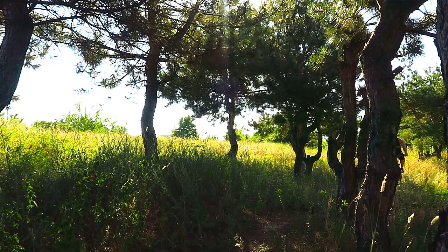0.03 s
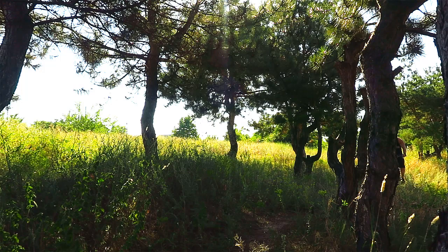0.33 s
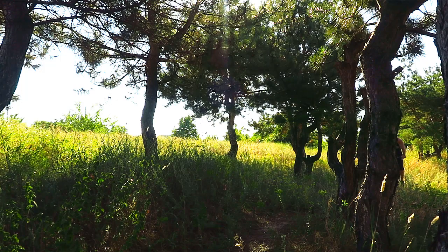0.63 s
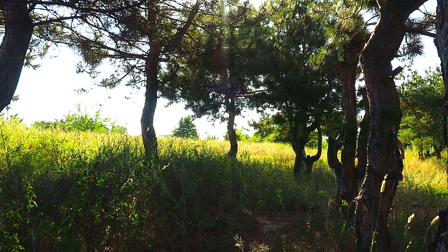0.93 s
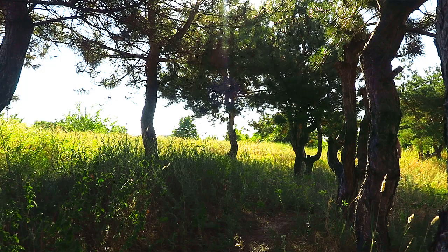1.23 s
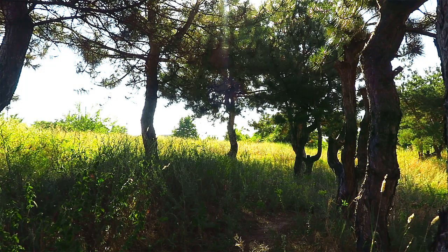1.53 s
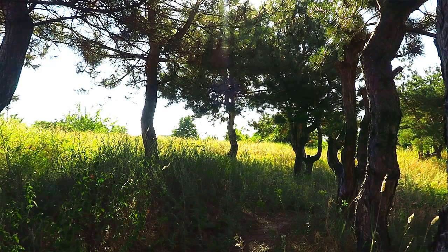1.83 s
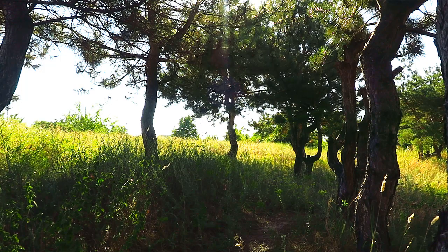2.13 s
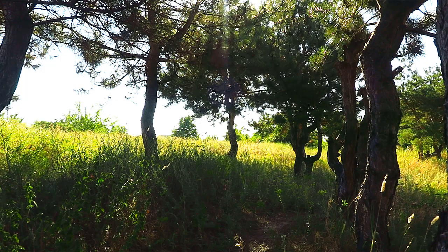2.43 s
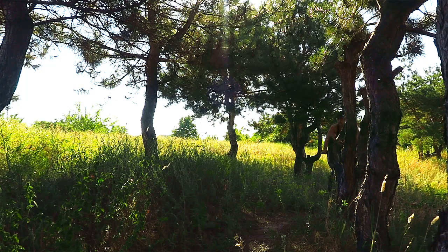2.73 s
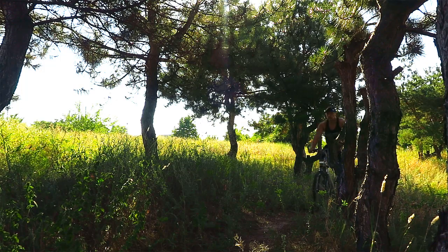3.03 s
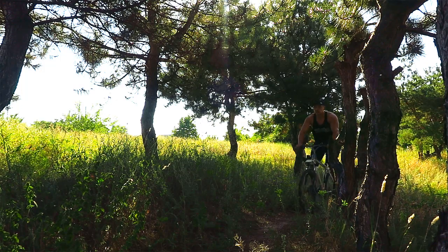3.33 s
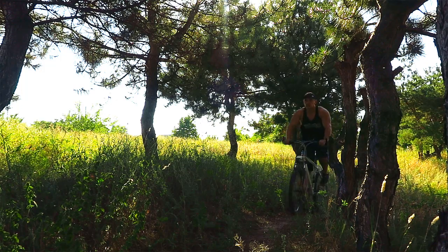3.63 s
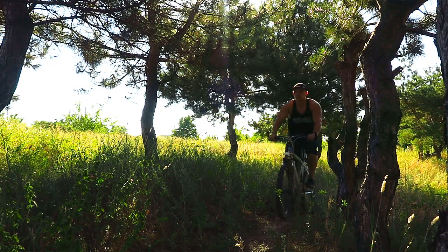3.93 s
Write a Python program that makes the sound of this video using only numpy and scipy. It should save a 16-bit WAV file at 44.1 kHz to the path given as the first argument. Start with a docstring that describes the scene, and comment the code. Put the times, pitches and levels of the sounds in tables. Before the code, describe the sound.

A bicycle rattles faintly, then clacks and crackles through dry grass, rumbling as it nears the microphone. Among the trees, a small bird gives quick sliding whistles and then hoarse rasps, with a short echo and soft distant air.

```python
"""The edge of a pine wood on a still day. Over a low hum, distant air and a few faint far-off tones,
a small bird twitters in quick sliding whistles and ends with a run of harsh, pulsing rasps.
A bicycle comes up a grassy track: bumps shake its chain and frame, loose parts clack, and its tyres
crackle through dry stalks, rumble and drone as it nears. The trees echo the bird and the rattling."""
import sys
import numpy as np
from scipy import signal
from scipy.fft import rfft, irfft, next_fast_len
from scipy.io import wavfile
from scipy.ndimage import uniform_filter1d, map_coordinates

SR = 44100
rng = np.random.default_rng(int(sys.argv[2]) if len(sys.argv) > 2 else 0)


def generate_wav(signal):
    """Clip the signal to [-1, 1] and save it as 16-bit WAV at the path in sys.argv[1]."""
    frames = np.transpose(np.atleast_2d(signal))
    scaled = np.clip(frames, -1, 1) * 32767
    pcm = np.round(scaled).astype(np.int16)
    wavfile.write(sys.argv[1], SR, pcm)


N = 176400


def amp(db):
    """Turn decibels into a number to multiply by."""
    return 10 ** (np.asarray(db) / 20)


def unit(x):
    """Scale a signal to an average strength (rms) of 1."""
    return x / np.sqrt(np.mean(x ** 2) + 1e-20)


def clock():
    """The time of each sample, in seconds."""
    return np.arange(N) / SR


def along(points, hz):
    """Read between (frequency, value) points, on a scale of octaves."""
    f, v = np.transpose(points)
    return np.interp(np.log(hz + 1), np.log(f + 1), v)


def level(rows):
    """A volume curve through (time, level) points."""
    return amp(np.interp(clock(), *np.transpose(rows)))


def wobble(rate):
    """A smooth random curve with `rate` new values a second."""
    return map_coordinates(rng.standard_normal(8192), [clock() * rate], mode='wrap')


def filtered(x, response):
    """Turn each frequency up or down by response(hz)."""
    size = next_fast_len(N + 8192)
    return irfft(rfft(x, size) * response(np.fft.rfftfreq(size, 1 / SR)), size)[..., :N]


def pan(db):
    """Left and right volumes; above 0 dB leans left."""
    return amp([[db / 2], [-db / 2]])


def gate(start, length, edge_s):
    """Switch a note on and off softly."""
    t = clock() - start
    return np.clip(np.minimum(t, length - t) / edge_s + .5, 0, 1)


def arch(start, length):
    """Rise from 0 to 1 and fall back."""
    return np.sin(np.pi * np.clip((clock() - start) / length, 0, 1))


# How wide noise sounds (frequency [Hz], side minus middle [dB])
STEREO_WIDTH = [(30, -44), (70, -50), (130, -14.5), (250, 0), (500, -4), (1100, -1.5), (2000, -0.5),
                (3000, 1), (4500, 2), (8000, 4), (12000, 4)]

def spread(pair, spectrum):
    """Give two noises a tone colour; one fills the middle, the other the sides."""
    def response(hz):
        width = amp(along(STEREO_WIDTH, hz))
        return amp(along(spectrum, hz)) * np.array([np.ones_like(hz), width]) / np.hypot(1, width)
    mid, side = filtered(pair, response)
    return unit(np.array([mid + side, mid - side]))


def crackle(spectrum, ticks_per_s=2200, tick_share=0.35, uneven_db=2.5):
    """Many tiny ticks of uneven size on a bed of hiss."""
    sizes = amp(uneven_db * np.minimum(rng.exponential(size=N), 4))
    ticks = unit((rng.random(N) < ticks_per_s / SR) * sizes * rng.standard_normal((2, N)))
    hiss = rng.standard_normal((2, N))
    return spread(np.sqrt(tick_share) * ticks + np.sqrt(1 - tick_share) * hiss, spectrum)


# Tone colour of the air (frequency [Hz], relative level [dB])
AIR_COLOUR = [(20, -8), (45, -3), (70, -1.5), (105, -0.5), (160, -7), (300, -10.5), (500, -9.5),
              (700, -15.5), (1200, -16.5), (1800, -23.5), (3200, -25), (4500, -29), (7000, -33.5),
              (12500, -40.5), (14000, -101)]
# Which side the air leans to (frequency [Hz], left minus right [dB])
AIR_LEAN = [(150, 0.5), (500, 0.5), (1100, -2), (2500, -0.5), (8000, 0)]

def air(level_db=-49, patchy_db=2):
    """A soft, slightly patchy rush from far away."""
    noise = signal.stft(rng.standard_normal((2, N)), nperseg=512)[2]
    patches = uniform_filter1d(rng.standard_normal(noise.shape[1:]), size=6, axis=0)  # blur in pitch
    patches = uniform_filter1d(patches, size=12, axis=1)  # blur in time
    pair = signal.istft(noise * amp(patchy_db * unit(patches)), nperseg=512)[1][:, :N]
    rush = amp(level_db) * spread(pair, AIR_COLOUR)
    return filtered(rush, lambda hz: amp(along(AIR_LEAN, hz) * np.array([[.5], [-.5]])))


# The tones in the hum (pitch [Hz], level [dB])
HUM_TONES = [(43, -57.5), (86.1, -54), (99.5, -52.5), (129.2, -54.5), (172.3, -71), (199.2, -67.5),
             (279.9, -64.5), (301.5, -68), (452.2, -63), (537, -79.5)]

def hum(waver_db=0.5, drift_rad=0.16):
    """Low, steady tones that waver a little."""
    out, t = np.zeros(N), clock()
    for hz, db in HUM_TONES:
        volume = np.sqrt(2) * amp(db + waver_db * wobble(4.84))
        out += volume * np.sin(2 * np.pi * (hz * t + rng.random()) + drift_rad * wobble(5.58))
    return out


# How loud the ground rumbles (time [s], level [dB])
RUMBLE_LEVELS = [(0, -68), (3.68, -61), (3.77, -50.5), (3.94, -53.5), (4, -51)]
# Tone colour of the soil (frequency [Hz], relative level [dB])
SOIL_COLOUR = [(40, -10), (85, 6), (115, 10), (135, -17.5), (170, 5), (300, -32)]

def ground_rumble():
    """The soil rumbles under the wheels, faintly until they are close."""
    return level(RUMBLE_LEVELS) * spread(rng.standard_normal((2, N)), SOIL_COLOUR)


# The bird's notes (time [s], length [s], first pitch [Hz], middle pitch [Hz], last pitch [Hz],
# relative level [dB])
BIRD_NOTES = [(.175, 0.022, 3430, 3220, 2880, -67), (.242, 0.028, 4020, 4470, 4330, -61),
              (.27, 0.012, 3120, 3250, 3270, -58.5), (.375, 0.019, 1607, 1550, 1450, -51.5),
              (.385, 0.028, 4200, 4050, 4150, -59), (.414, 0.013, 3670, 4500, 5400, -56.5),
              (.427, .019, 5600, 4800, 3700, -55.5), (.466, .04, 3750, 5200, 5020, -60),
              (.485, .024, 3720, 4650, 3850, -50), (.526, 0.019, 3610, 3330, 2900, -51.5),
              (.559, 0.015, 3810, 4300, 4300, -55), (.757, 0.012, 3530, 3880, 4000, -62.5),
              (.801, .025, 4070, 4390, 3650, -66), (.905, 0.026, 5050, 4500, 3600, -59),
              (.947, .045, 3400, 3940, 4680, -56.5), (.969, 0.037, 4750, 5000, 4680, -58),
              (.992, 0.027, 3270, 3410, 3300, -57.5), (1.048, 0.033, 3610, 3700, 4210, -55),
              (1.157, .023, 3570, 3150, 2620, -57.5), (1.211, 0.019, 3540, 3600, 3450, -60),
              (1.291, .022, 3710, 3150, 2560, -58), (1.396, 0.043, 3810, 4600, 4000, -58),
              (1.451, .028, 3800, 4550, 4370, -53.5), (1.477, 0.024, 3910, 4400, 3820, -53.5),
              (1.517, .014, 4320, 4500, 4070, -53.5), (1.54, 0.015, 3430, 3800, 4370, -51.5),
              (1.555, 0.015, 4620, 3900, 3450, -58), (1.603, 0.018, 3950, 4000, 4300, -69),
              (1.631, .022, 3650, 4050, 4040, -68), (2.013, 0.04, 3790, 4600, 3750, -59),
              (2.072, 0.019, 3750, 4300, 5470, -53), (2.091, 0.032, 4930, 4150, 3900, -57.5),
              (2.152, 0.03, 4030, 3750, 3950, -59), (2.179, 0.018, 3780, 4150, 3700, -50.5),
              (2.192, 0.042, 4700, 5400, 4900, -62.5), (2.215, 0.031, 3550, 3450, 3080, -60),
              (2.262, 0.019, 3390, 4100, 4400, -61), (2.683, 0.034, 3970, 4400, 3940, -54.5),
              (2.752, .029, 3540, 4000, 4040, -54), (2.799, 0.036, 3790, 3530, 4270, -56.5),
              (2.886, 0.015, 3700, 3330, 3050, -50), (3.088, 0.017, 3280, 4300, 5070, -54.5),
              (3.107, .016, 4780, 3900, 3100, -47.5)]

def twitter(jitter_hz=144, breath_db=-7, flutter_db=2.5, trunk_db=-7):
    """A bird's quick, slightly hoarse whistles bend and flutter, blurred by echoes from the trunks."""
    song, t = np.zeros(N), clock()
    jitter = jitter_hz * wobble(700)
    hoarse = 1 + amp(breath_db) * (wobble(1500) + 1j * wobble(1500)) / np.sqrt(2)
    for start, length, first, middle, last, db in BIRD_NOTES:
        volume = gate(start, length, edge_s=0.0056)
        on = volume > 0
        progress = np.clip((t[on] - start) / length, 0, 1)
        bend = (middle - (first + last) / 2) * np.sin(np.pi * progress)
        hz = first + (last - first) * progress + bend + jitter[on]
        whistle = np.exp(2j * np.pi * np.cumsum(hz) / SR)
        song[on] += amp(db) * volume[on] * np.imag(hoarse[on] * whistle)
    song *= unit(amp(flutter_db * wobble(250)))
    echoes = np.array([trunk_echoes(song), trunk_echoes(song)])
    return (song + amp(trunk_db) * echoes) * pan(db=4)


def trunk_echoes(x, count=8, longest_s=.03):
    """Nearby trunks throw back a handful of quick echoes."""
    delays = rng.random(count) * longest_s
    return sum(np.roll(x, int(delay * SR)) for delay in delays) / np.sqrt(count)


# How long the wood echoes (frequency [Hz], time to fade by 60 dB [s])
ECHO_FADES = [(300, 0.053), (4000, 0.41), (8000, 0.22), (12000, 0.069)]

def wood_echo(x):
    """Trunks and treetops scatter sound into a short tail that lasts longest near 4000 Hz."""
    hz, t, noise = signal.stft(rng.standard_normal((2, SR // 2)), SR, nperseg=256)
    fade = amp(-60 * t / along(ECHO_FADES, hz)[:, None])
    tail = signal.istft(noise * fade, SR, nperseg=256)[1]
    return signal.fftconvolve(x, tail / np.linalg.norm(tail[0]), axes=1)[:, :N]


# Bumps in the track; a fade is the time to drop by 60 dB
# (time [s], chain level [dB], chain fade [s], frame level [dB], frame fade [s])
TRACK_BUMPS = [(.205, -68, 0.38, -60, 0.3), (.947, -55, 0.33, -57.5, 1), (1.175, -55.5, 0.31, -54, 0.42),
               (1.45, -63.5, 1, -55.5, 0.33), (1.693, -60, .25, -75, .2), (2.571, -47.5, 0.19, -59, .1),
               (2.586, -46, 0.4, -49, 0.1), (2.602, -48.5, 0.16, -47.5, 0.34), (2.639, -68, .15, -46, 0.17),
               (2.92, -51, 0.14, -60, 0.14), (2.972, -80, .12, -51.5, 0.22),
               (2.982, -72, 0.088, -46.5, 0.16), (3.26, -59, 0.59, -75, 0.19),
               (3.593, -56.5, 0.34, -56, 0.24)]
# Tone colours of the chain and the frame (frequency [Hz], relative level [dB])
CHAIN_COLOUR = [(2000, -18), (4500, 7.5), (7000, 5.5), (10000, 9), (12500, 11), (14000, -6)]
FRAME_COLOUR = [(120, -55), (280, -14), (600, 6), (1200, 2.5), (2000, 7), (3300, 4.5), (5000, -1),
                (9000, -12.5)]

def rattles(chain_rise_s=.011, frame_rise_s=0.00036):
    """Each bump shakes a bright hiss from the chain and a duller clatter from the frame."""
    chain, frame = np.zeros((2, N))
    for start, chain_db, chain_fade, frame_db, frame_fade in TRACK_BUMPS:
        age = np.maximum(clock() - start, 0)
        chain = np.hypot(chain, (1 - np.exp(-age / chain_rise_s)) * amp(chain_db - 60 * age / chain_fade))
        frame = np.hypot(frame, (1 - np.exp(-age / frame_rise_s)) * amp(frame_db - 60 * age / frame_fade))
    return chain * crackle(CHAIN_COLOUR) + frame * crackle(FRAME_COLOUR) * pan(db=-1)


# Far-off tones (time [s], length [s], pitch [Hz], level [dB])
FAR_TONES = [(0.559, 0.08, 732, -57.5), (1.127, 0.084, 680, -56.5), (2.034, 0.096, 635, -59)]

def far_tones(blur_hz=170):
    """Faint, blurred low tones swell and fade far away."""
    blur = unit(wobble(blur_hz)) + 1j * unit(wobble(blur_hz))
    return sum(amp(db) * arch(start, length) * np.real(blur * np.exp(2j * np.pi * hz * clock()))
               for start, length, hz, db in FAR_TONES)


# How loud the grass crackles (time [s], level [dB])
GRASS_LEVELS = [(0, -93), (1.9, -74), (2.35, -68.5), (2.6, -60.5), (3.4, -58), (3.8, -52), (4, -55)]
# Tone colour of tyres on grass (frequency [Hz], relative level [dB])
GRASS_COLOUR = [(100, -13), (350, 3), (700, -2), (1200, -4.5), (2000, -5), (4000, -11.5), (8000, -34),
                (12000, -44), (13900, -51)]

def dry_grass(flutter_db=1.5):
    """Dry stalks crackle under the tyres, louder as the bicycle nears."""
    return level(GRASS_LEVELS) * amp(flutter_db * wobble(24.67)) * crackle(GRASS_COLOUR)


# The bicycle's hollow knocks (time [s], pitch [Hz], level [dB], length [s])
HOLLOW_KNOCKS = [(2.553, 241, -47, 0.041), (2.582, 326, -48.5, 0.045), (2.864, 434, -40, 0.019),
                 (2.944, 393, -43, 0.03), (3.216, 488, -45.5, 0.023), (3.734, 88.7, -36.5, 0.063)]

def knocks():
    """Soft, hollow tones swell and die within a few hundredths of a second."""
    return sum(amp(db) * arch(start, length) * np.sin(2 * np.pi * hz * (clock() - start))
               for start, hz, db, length in HOLLOW_KNOCKS)


# Hits of loose parts (time [s], level [dB])
LOOSE_HITS = [(2.590, -40.5), (2.6027, -47), (2.607, -47), (2.6325, -48), (2.9274, -54), (2.9727, -36.5),
              (2.9874, -45), (2.9945, -44.5), (2.9984, -43)]
# Tone colour of a clack (frequency [Hz], relative level [dB])
CLACK_COLOUR = [(300, -16.5), (900, -8), (2000, 2.5), (3500, -9), (6000, -13.5), (13000, -31)]

def clacks(fade_s=.011):
    """Loose parts hit each other, each time making a sharp burst of noise."""
    t = clock()
    hits = sum(amp(db - 60 * np.maximum(t - start, 0) / fade_s) * (t >= start) for start, db in LOOSE_HITS)
    noise = rng.standard_normal((2, N)) * [[1], [.5]]  # weaker at the sides
    return hits * spread(noise, CLACK_COLOUR) * pan(db=-2.5)


# The bird's harsh notes (time [s], length [s], centre pitch [Hz], relative level [dB])
HARSH_NOTES = [(3.085, 0.044, 3070, -50.5), (3.188, 0.022, 3140, -51), (3.253, 0.098, 3300, -49.5),
               (3.409, 0.08, 3330, -50), (3.542, 0.096, 3260, -51), (3.665, 0.045, 2930, -52),
               (3.701, 0.084, 3120, -49), (3.822, 0.091, 2860, -53), (3.98, .04, 2800, -55.5)]
# Tone colour of a rasp centred on 3300 Hz (frequency [Hz], relative level [dB])
RASP_COLOUR = [(1200, -22), (2100, -11), (2600, -4), (3000, -2), (3200, -5.5), (3450, 3), (3700, -4),
               (4500, -14.5), (6000, -30)]

def rasps(pulses_per_s=260, pulse_s=.0018, uneven=.35, grain_db=2.5, swell_db=2):
    """The bird rasps: uneven puffs of noise ring at a pitch that rises a little, then sinks."""
    cycles = np.cumsum(pulses_per_s * np.exp(uneven * wobble(150))) / SR
    sizes = amp(grain_db * np.clip(wobble(160), -2, 1))
    puffs = np.exp(-(cycles % 1) / pulses_per_s / pulse_s) * sizes * rng.standard_normal((2, N))
    out = np.zeros((2, N))
    for start, length, hz, db in HARSH_NOTES:
        note = unit(filtered(puffs, lambda f: amp(along(RASP_COLOUR, f * 3300 / hz))))
        volume = amp(db + swell_db * (arch(start, length) - 2.5))
        out += volume * gate(start, length, edge_s=0.013) * note
    mid, side = out[0], amp(-28) * out[1]
    return np.array([mid + side, mid - side]) * pan(db=1)


# The drone of the tyre tread (time [s], pitch [Hz], level [dB])
TREAD_DRONE = [(3.7, 114.2, -85), (3.79, 131, -48), (3.87, 137, -51), (3.95, 131.4, -46), (4, 124.6, -49)]

def tyre_tread():
    """The rolling tread drones on one low, gliding note as the wheels come close."""
    times, hz, db = np.transpose(TREAD_DRONE)
    phase = 2 * np.pi * np.cumsum(np.interp(clock(), times, hz)) / SR
    return np.sqrt(2) * amp(np.interp(clock(), times, db)) * np.sin(phase)


def scene():
    """Bird and bicycle among the trees, over the air and the hum."""
    song = amp(-3) * twitter()
    harsh = rasps()
    bike = rattles() + clacks() + knocks()
    echo = wood_echo(amp(-8) * song + amp(-16.5) * bike + amp(-8.5) * harsh)
    background = air() + hum() + far_tones()
    wheels = dry_grass() + tyre_tread() + ground_rumble()
    return background + song + harsh + bike + wheels + echo


def record(dry, start_s=0.057, fade_in_s=.008, top_hz=13900):
    """Fade in quickly after a moment of silence and cut off the highest treble."""
    fade_in = np.clip((clock() - start_s) / fade_in_s, 0, 1)
    return filtered(dry * fade_in, lambda hz: hz < top_hz)


dry = scene()
out = record(dry)
generate_wav(out)
```